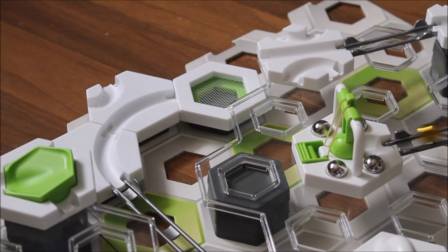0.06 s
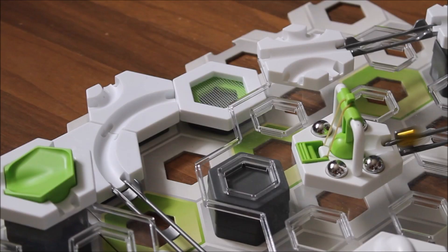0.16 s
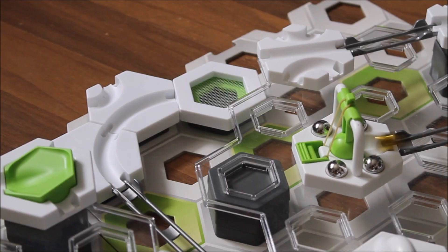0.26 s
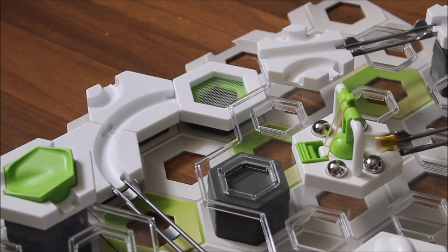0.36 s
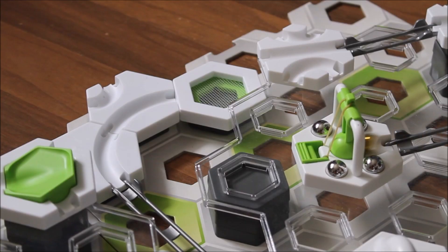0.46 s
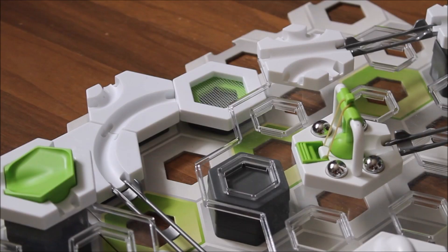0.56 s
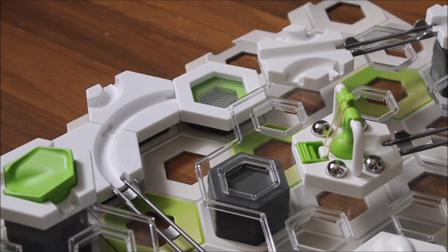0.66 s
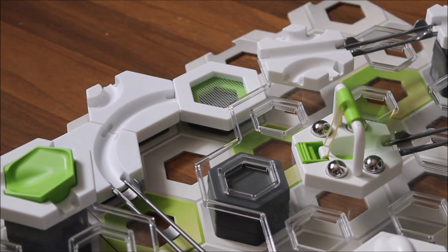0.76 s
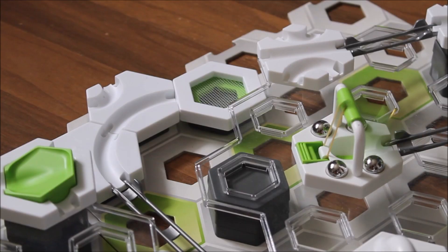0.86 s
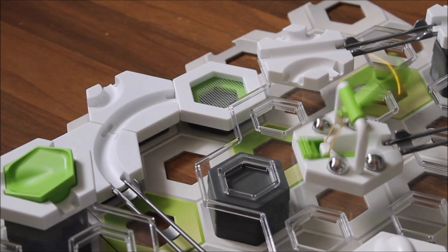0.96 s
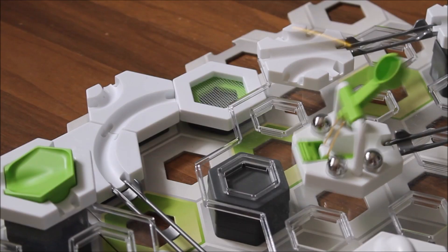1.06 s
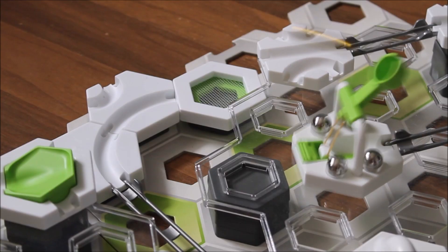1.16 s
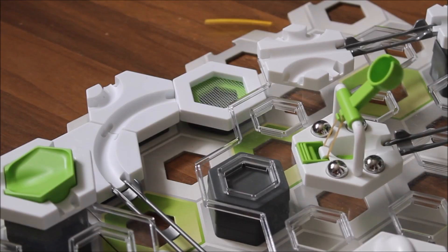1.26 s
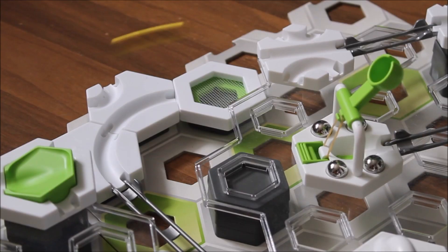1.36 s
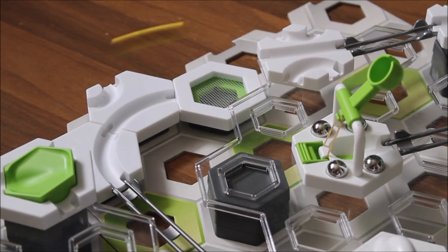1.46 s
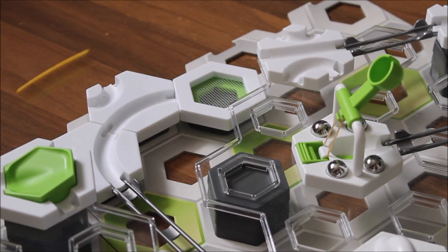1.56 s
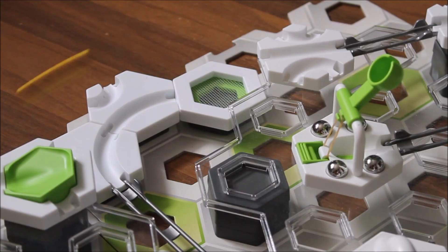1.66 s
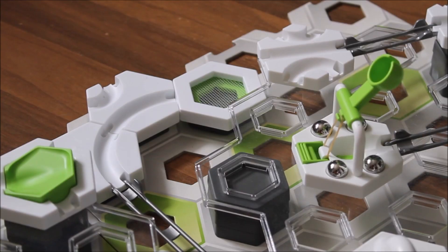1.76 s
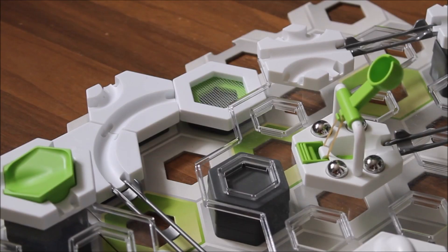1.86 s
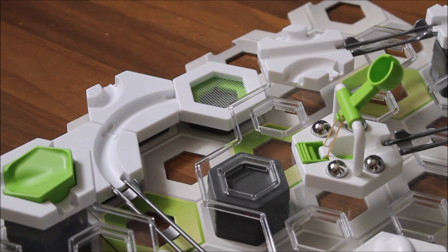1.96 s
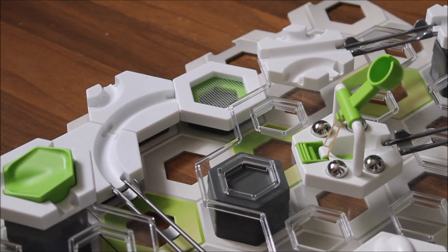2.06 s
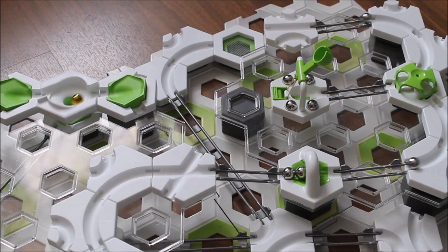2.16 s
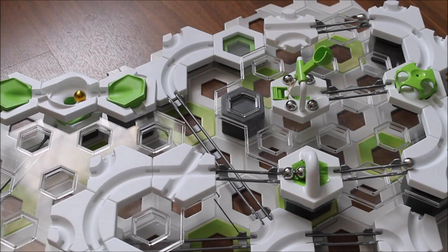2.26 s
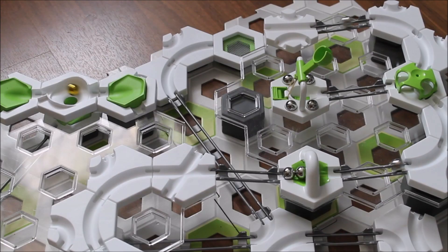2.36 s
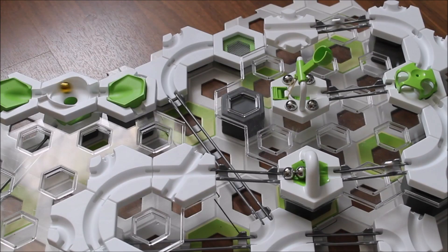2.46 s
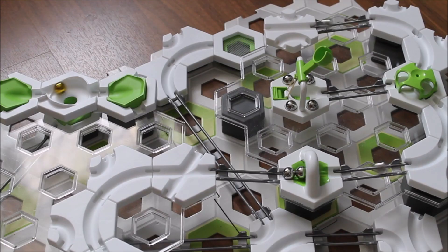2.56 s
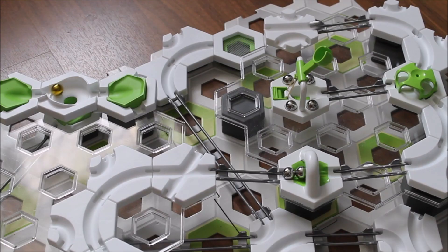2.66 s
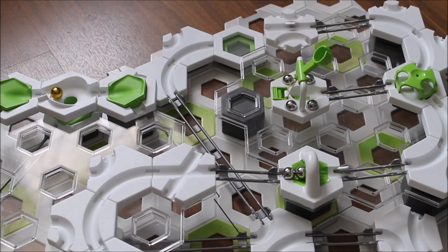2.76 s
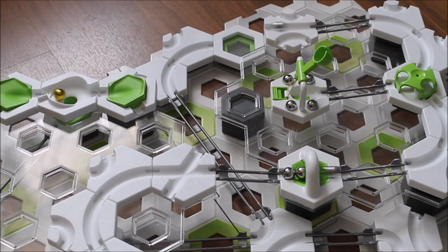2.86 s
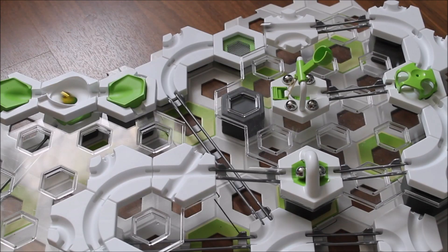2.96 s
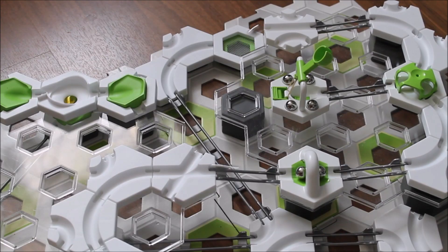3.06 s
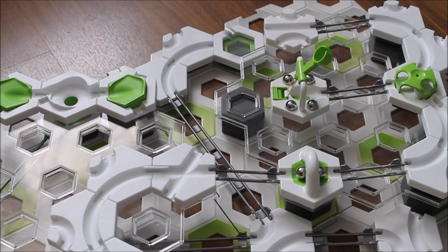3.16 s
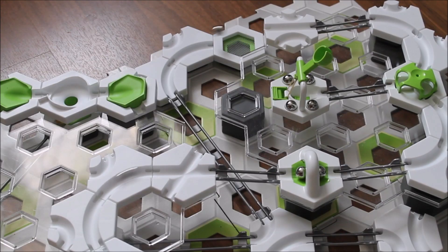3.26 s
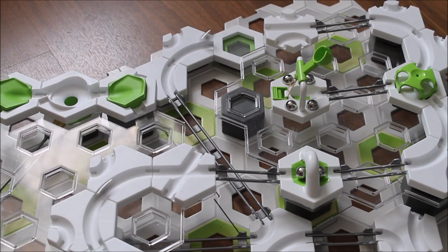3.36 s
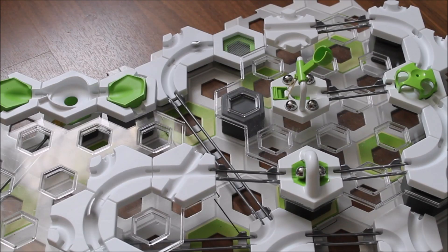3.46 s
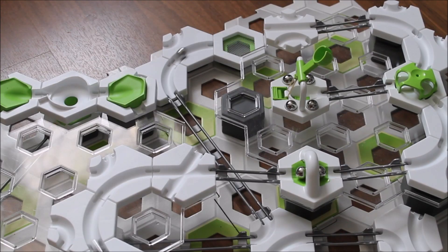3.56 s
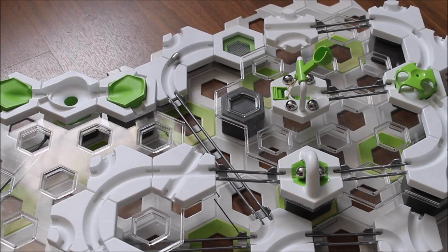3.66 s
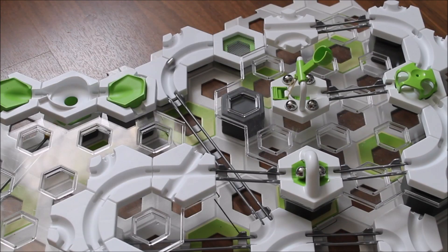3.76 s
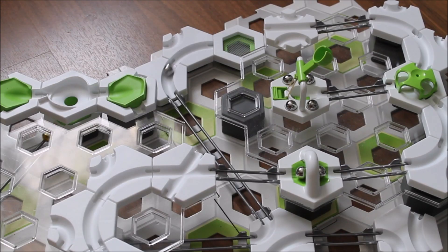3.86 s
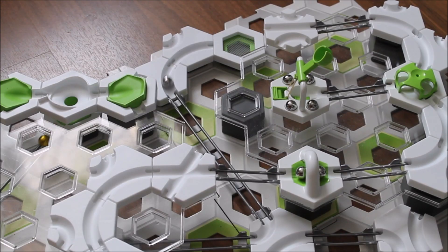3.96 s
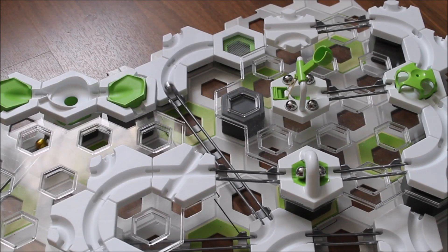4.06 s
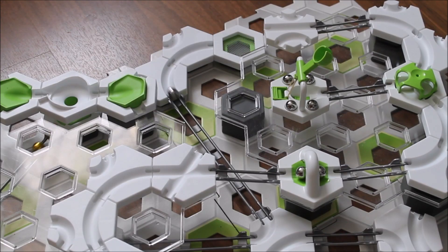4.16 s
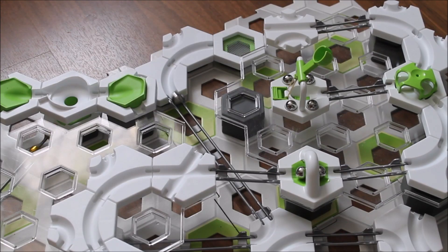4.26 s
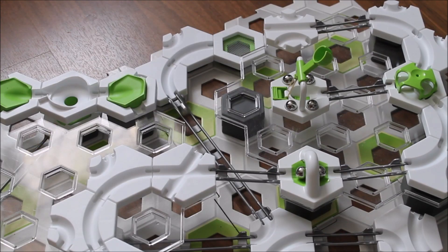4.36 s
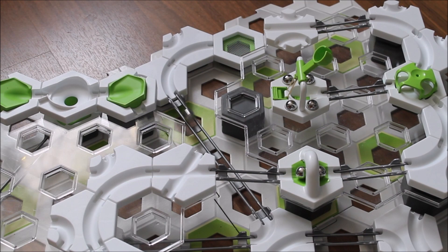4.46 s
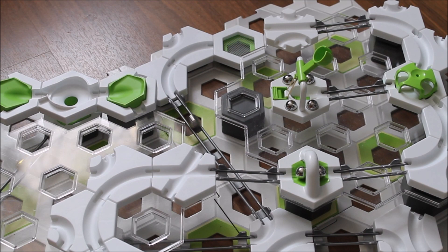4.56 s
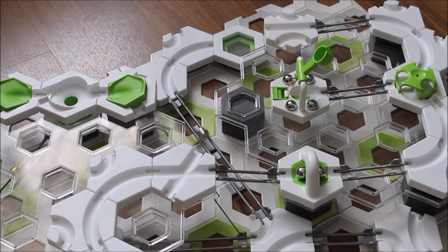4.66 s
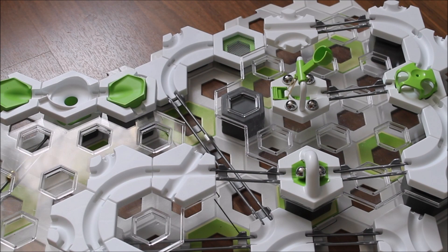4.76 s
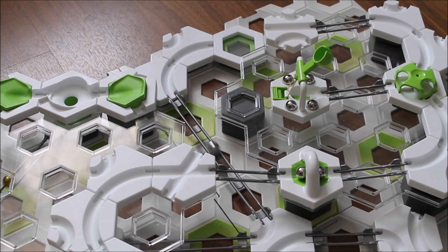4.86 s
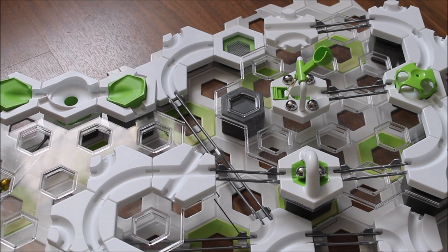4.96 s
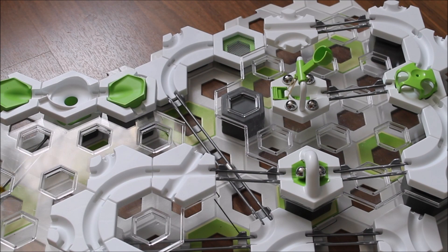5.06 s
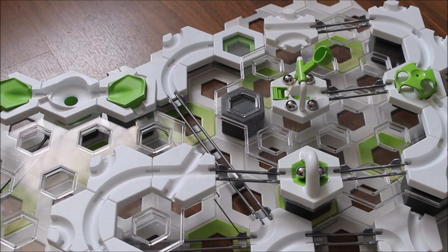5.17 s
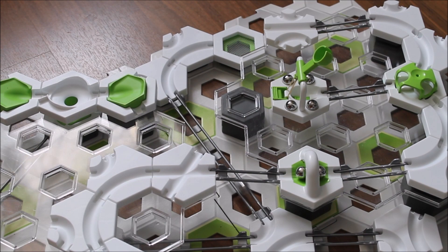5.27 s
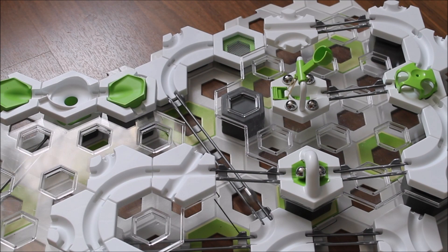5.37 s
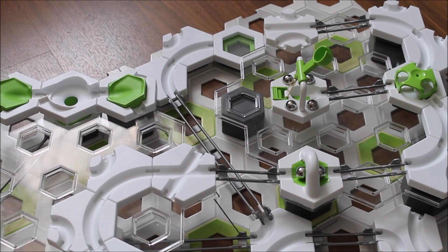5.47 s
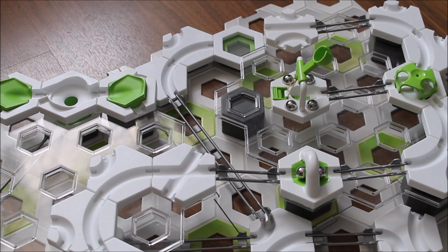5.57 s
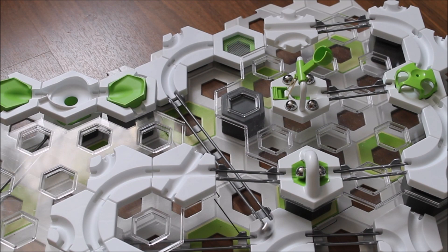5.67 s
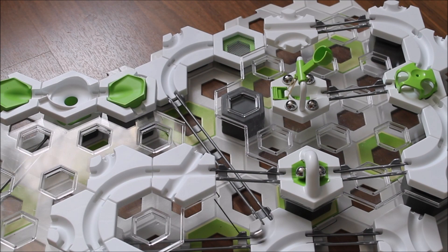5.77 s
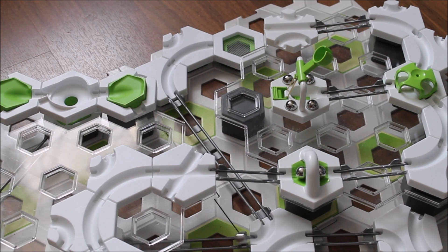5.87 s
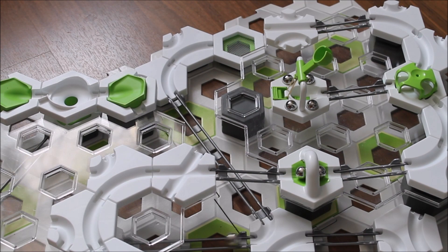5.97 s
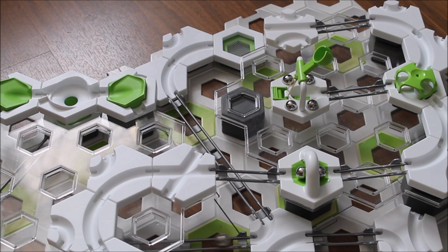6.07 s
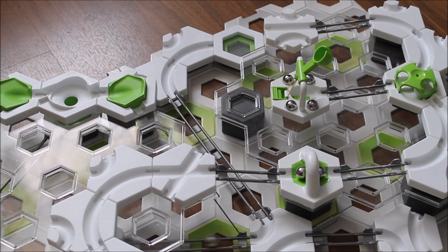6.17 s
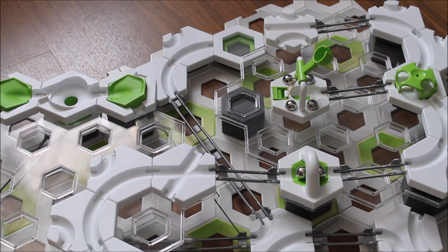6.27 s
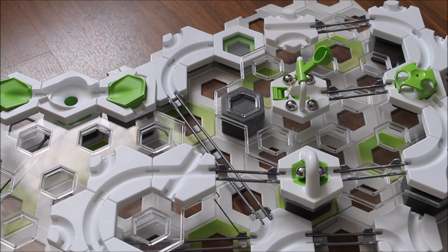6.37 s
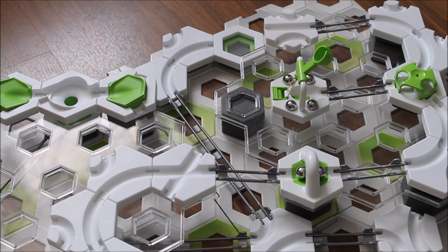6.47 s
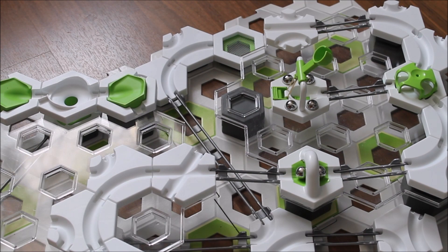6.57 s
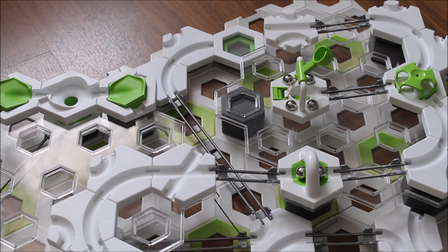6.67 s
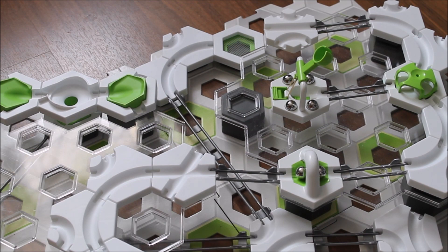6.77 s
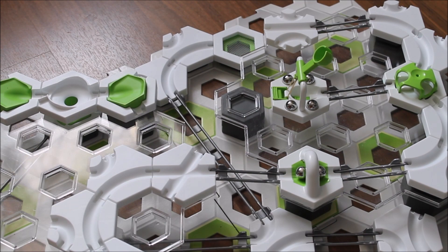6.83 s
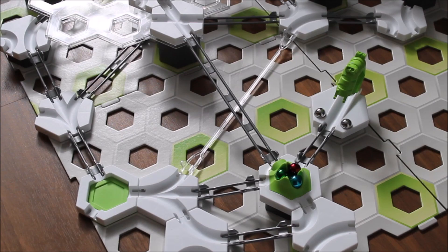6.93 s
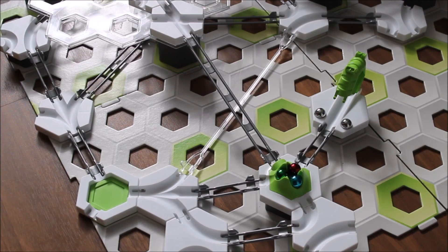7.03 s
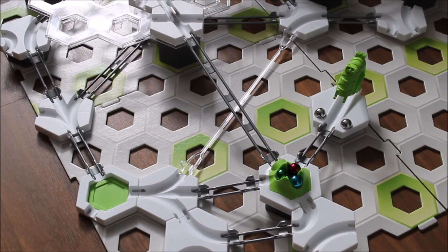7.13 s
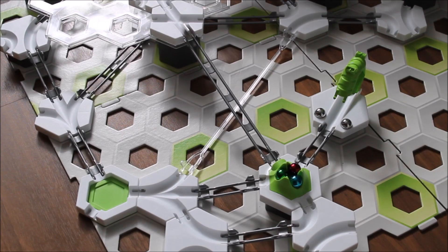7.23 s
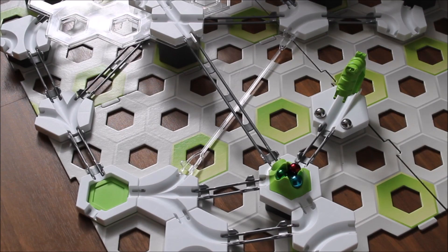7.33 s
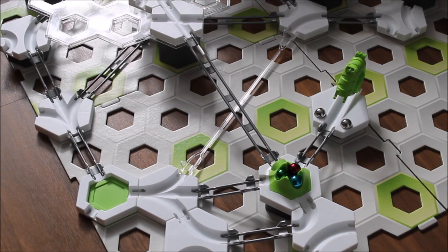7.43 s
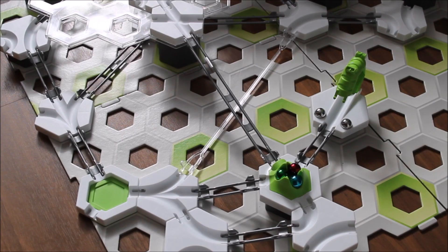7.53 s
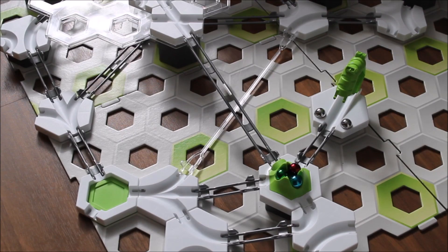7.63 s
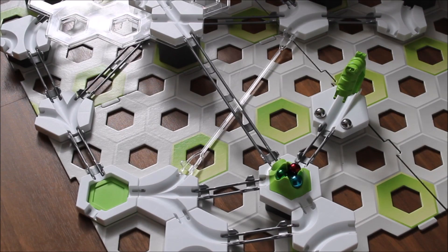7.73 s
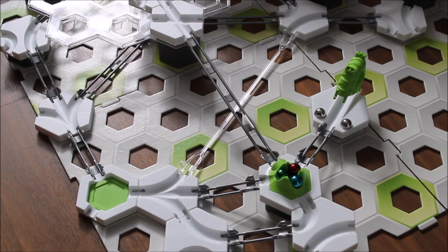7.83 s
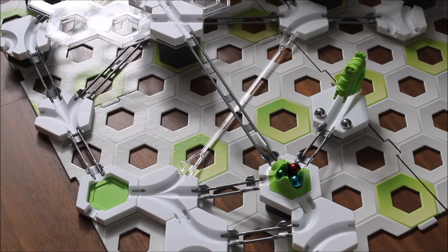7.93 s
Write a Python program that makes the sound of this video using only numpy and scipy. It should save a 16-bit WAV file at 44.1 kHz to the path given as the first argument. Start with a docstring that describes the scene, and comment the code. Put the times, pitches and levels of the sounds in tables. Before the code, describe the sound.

Small steel and glass marbles run through a hollow plastic track in a bare, echoing room, heard close. Hard knocks open, then a catapult launch plays slowed and an octave lower, with dull clunks and rail rattle. At normal speed come sharp landings, a rolling rumble and a bright clack. Sparse rail ticks follow in a quiet middle, then knocks and rolling return and fade away.

```python
"""Marble run in a ringing room

Marbles rumble over tiles, whirr along rails, knock into junctions, clack on steel and set off a catapult.
Knocks are taps with chatter, rolling is random bumps; both are coloured by the track and fill a bare room. Four
stretches follow one another, the second in slow motion: half as fast and an octave down. The hardest knocks
clip; a faint hiss lies below."""
import sys
import numpy as np
from scipy import signal
from scipy.fft import rfft, irfft
from scipy.io import wavfile

SR = 44100
rng = np.random.default_rng(int(sys.argv[2]) if len(sys.argv) > 2 else 0)


def to_wav(sig):
    """Store sig (one row per channel, or 1-D mono) as 16-bit WAV at the path in sys.argv[1].

    Samples outside -1..1 are clipped; the rate is SR.
    """
    pcm = np.clip(np.atleast_2d(sig), -1, 1) * 32767
    pcm = np.round(pcm).astype(np.int16)
    wavfile.write(sys.argv[1], SR, pcm.T)  # frames by channels


N = 352800
HZ = np.maximum(np.fft.rfftfreq(4096, 1 / SR), 10)   # grid for all track colours


def hit(part, strength_db, bright_db, direct_db, ring_q=3.7):
    """Knock: the struck part sets thud and ring, hardness sets the treble, the room answers."""
    # What a marble can strike. Each entry: bass thud in dB, ring in Hz, ring level in dB; all at full speed.
    struck_parts = {"tile": (-3, 2220, 6.1), "base plate": (6.5, 620, 9.9), "lever": (-4, 400, 15),
                    "bowl": (2.1, 974, 11.6), "junction": (0.9, 1380, 7.8), "switch": (1, 3200, 9),
                    "rail end": (0.81, 4040, 3.2), "rail": (5, 5900, 8), "catapult": (-8.5, 2800, 9.9),
                    "marble": (-12.5, 10200, 9.6), "landing": (4.5, 10300, 6), "stop": (16, 1500, 9.6)}
    # Plain hit. Each row: frequency in Hz, level in dB per Hz.
    hit_spectrum = [(50.0, -45.5), (100.0, -27), (200.0, -22.5), (350.0, -12), (600.0, -10.5),
                    (1000.0, -10), (1600.0, -9), (2500.0, -9.5), (3600.0, -13), (5000.0, -18),
                    (7000.0, -26.0), (9500.0, -34.5), (11500.0, -44)]
    thud_db, ring_hz, ring_db = struck_parts[part]
    thud = thud_db * at_hz([(50, 0.0), (230, 0.88), (1000, 0.014)])
    hardness = bright_db * at_hz([(1500, 0.036), (9000, 1)])
    ring = ring_db * resonance(ring_hz, ring_hz / ring_q)
    spot = loose_parts(spread_db=6.5, part_q=41.0)
    force = from_db(direct_db) * contact() + room_echoes()
    return through_track(force, strength_db + at_hz(hit_spectrum) + thud + hardness + ring + spot)


def contact(chatter_share=0.71, chatter_t60_s=0.025):
    """A one-sample tap, then the decaying noise chatter of loosely fitted parts; total energy 1."""
    t = np.arange(SR) / SR
    chatter = rng.standard_normal(SR) * np.exp(-np.log(1000) * np.minimum(t / chatter_t60_s, 10))
    chatter[0] = 0
    force = chatter * np.sqrt(chatter_share / np.sum(chatter ** 2))
    force[0] = np.sqrt(1 - chatter_share)
    return force


def loose_parts(spread_db, part_q, count=13):
    """Sharp random resonances of the struck spot, in dB; mean 0 dB on a log-frequency axis."""
    edges_hz = np.geomspace(600, 11000, count + 1)
    centres_hz = rng.uniform(edges_hz[:-1], edges_hz[1:])
    bumps_db = spread_db * np.max([resonance(hz, hz / part_q) for hz in centres_hz], axis=0)
    inside = (HZ > edges_hz[0]) * (HZ < edges_hz[-1])
    return bumps_db - inside * np.average(bumps_db, weights=inside / HZ)


def jolt(part, strength_db, bright_db, direct_db):
    """A marble strikes a joint's edge, hops and touches again: tap about as strong, less room behind it."""
    rebound_s, rebound_db, rebound_direct_db = .013, -6.5, 7
    first = hit(part, strength_db, bright_db, direct_db)
    second = hit(part, strength_db + rebound_db, bright_db, direct_db + rebound_direct_db)
    return first + np.pad(second, (round(rebound_s * SR), 0))[:len(first)]


def ringing_part(hz, level_db, t60_s, room_db=-2):
    """One lightly damped mode of a struck part, prolonged by the room."""
    t = np.arange(SR // 2) / SR
    tone = from_db(level_db) * np.sin(2 * np.pi * hz * t) * np.exp(-np.log(1000) * t / t60_s)
    tone = tone * (1 - np.exp(-hz * t))   # about one cycle to start swinging
    return tone + from_db(room_db) * signal.fftconvolve(tone, room_echoes())[:len(t)]


def clack(modes_db, splash_db, splash_hz=10000, splash_width_hz=7000):
    """Very short marble-on-steel contact: a treble splash in the room and a thin metallic shimmer."""
    # Bright, long modes. Each row: frequency in Hz, relative level in dB, t60 in seconds.
    steel_modes = [(7052, -4, .4), (7445, 0, .37), (7989, -4, .37), (9038, -2, .35), (9722, -2, .38),
                   (10440, -2, .34)]
    t = np.arange(SR) / SR
    shimmer = np.zeros(SR)
    for hz, db, t60_s in steel_modes:
        decay = np.exp(-np.log(1000) * t / t60_s)
        shimmer += from_db(modes_db + db) * np.sin(2 * np.pi * hz * t) * decay
    splash_colour_db = splash_db + 50 * (resonance(splash_hz, splash_width_hz) - 1)
    return shimmer + through_track(room_echoes(), splash_colour_db)[:SR]


def tile_rumble(clock_s):
    """Marbles rolling on tiles: dense small bumps, mostly low."""
    # Colour of rolling on tiles. Each row: frequency in Hz, level in dB per Hz.
    tile_spectrum = [(50.0, -42), (120.0, -20), (250.0, -5.5), (420.0, 1), (750.0, -1), (1200.0, -5.5),
                     (2000.0, -16.5), (3200.0, -32.5), (5500.0, -37.5), (11500.0, -51.5)]
    # Course of the rumble. Each row: scene time in seconds, level in dB.
    tile_level = [(0, -42), (.14, -57), (.43, -21.5), (1.05, -23), (1.6, -30), (1.95, -42.5), (2.25, -26),
                  (2.53, -45), (2.76, -24), (3.02, -17.5), (3.33, -5.5), (3.6, -17.5), (3.76, -15.5),
                  (4.3, -30), (4.8, -27), (5.05, -41), (5.6, -41.5), (5.8, -28.5), (6.7, -57),
                  (6.87, -20.5), (7.2, -18.5), (7.5, -29), (8, -30)]
    roll = rolling(at_hz(tile_spectrum), len(clock_s), bumps_per_s=600, uneven_db=3.0, direct_db=-1.0)
    return gain_at(tile_level, clock_s) * roll


def rail_whirr(clock_s):
    """Marbles rolling on steel rails: sparser bumps make the rails sing."""
    # Colour of rolling on rails. Each row: frequency in Hz, level in dB per Hz.
    rail_spectrum = [(50.0, -27), (120.0, -13), (250.0, -10.5), (420.0, -15.5), (750.0, 1), (1200.0, -3),
                     (2000.0, -5.5), (3200.0, -12), (5500.0, -20), (11500.0, -41)]
    # Singing of the rails. Each row: frequency in Hz, width in Hz, level in dB.
    rail_modes = [(835, 52, 2.5), (1860, 50, 5), (2840, 90, 4.5)]
    # Course of the whirr. Each row: scene time in seconds, level in dB.
    rail_level = [(0, -26), (.13, -19.5), (.43, -35.5), (.75, -36.5), (1.35, -14), (1.95, -33.5),
                  (2.6, -33.5), (3.9, -51), (4.45, -34), (4.95, -34), (5.25, -39.5), (6.05, -36.5),
                  (6.2, -48.5), (6.45, -33), (6.6, -21.5), (6.92, -18), (7.3, -46.5), (8, -29.5)]
    singing_db = sum(db * resonance(hz, width_hz) for hz, width_hz, db in rail_modes)
    colour_db = at_hz(rail_spectrum) + singing_db
    roll = rolling(colour_db, len(clock_s), bumps_per_s=250, uneven_db=3.5, direct_db=-9.0)
    return gain_at(rail_level, clock_s) * roll


def rolling(colour_db, size, bumps_per_s, uneven_db, direct_db):
    """Random bumps of uneven size under the marbles shake the track and fill the room."""
    length = size + SR   # one second of lead-in fills the room
    sizes = from_db(uneven_db * np.minimum(rng.exponential(1, length), 4))
    sizes = sizes * rng.choice([-1, 1], length)
    bumps = sizes * (rng.random(length) < bumps_per_s / SR)
    in_room = signal.fftconvolve(bumps, room_echoes())[:length]
    force = (from_db(direct_db) * bumps + in_room)[SR:]
    return through_track(force / np.std(force), colour_db)[:size]


def through_track(force, colour_db):
    """Colour a force and let the track's modes ring; minimum phase, so nothing sounds early."""
    # Resonances of the assembled track. Each row: frequency in Hz, width in Hz, level in dB.
    track_modes = [(403, 38, -0.5), (820, 150, 3.5), (1021, 16, 1.5), (1285, 15, -4), (1483, 31, 2.5),
                   (1775, 17, 3), (1920, 86, 4), (2208, 21, 2.5), (2428, 69, 2.5), (2490, 15, 0),
                   (2650, 37, 5), (3520, 60, 5.5), (3870, 70, 3), (4480, 60, 3.5), (5150, 420, -3),
                   (6000, 800, 0)]
    modes_db = sum(db * resonance(hz, width_hz) for hz, width_hz, db in track_modes)
    # folding the cepstrum gives minimum phase
    cepstrum = irfft(np.log(from_db(colour_db + modes_db)))
    cepstrum[1:len(HZ) - 1] *= 2
    cepstrum[len(HZ):] = 0
    return signal.fftconvolve(force, irfft(np.exp(rfft(cepstrum))))


def room_echoes():
    """One second of dense noise echoes, drawn anew for each source; the treble dies first."""
    # Decay of the room. Each row: band centre in Hz, t60 in seconds.
    room_decay = [(100, 0.87), (400, 0.79), (2500, 0.75), (4500, 0.62), (9000, 0.4)]
    room_db, build_s = -33.5, 0.0024
    t = np.arange(SR) / SR
    white = rfft(rng.standard_normal(SR))
    hz = np.maximum(np.fft.rfftfreq(SR, 1 / SR), 10)
    centres_hz, t60s_s = np.transpose(room_decay)
    tail = np.zeros(SR)
    for own, t60_s in zip(np.eye(len(centres_hz)), t60s_s):
        share = np.interp(np.log(hz), np.log(centres_hz), own)   # overlapping triangular bands
        tail += irfft(white * share) * np.exp(-np.log(1000) * t / t60_s)
    return from_db(room_db) * tail * (1 - np.exp(-t / build_s))


def hiss(size):
    """Faint, steady background of the room: shaped noise."""
    # Each row: frequency in Hz, level in dB per Hz.
    hiss_spectrum = [(40, -49), (300, -46), (2000, -63.5), (11000, -67.5)]
    hz = np.fft.rfftfreq(size, 1 / SR) + 1
    return irfft(rfft(rng.standard_normal(size)) * from_db(at_hz(hiss_spectrum, hz)), size)


def from_db(db):
    """Decibels to gain."""
    return 10 ** (np.asarray(db) / 20)


def at_hz(points, hz=HZ):
    """Read a table on a log-frequency axis."""
    freqs_hz, values = np.transpose(points)
    return np.interp(np.log(hz), np.log(freqs_hz), values)


def resonance(hz, width_hz):
    """Bell of height 1 around a resonance."""
    return 1 / (1 + (2 * hz / width_hz * np.log(HZ / hz)) ** 2)


def gain_at(curve, clock_s):
    """Read a level curve in dB at the given times, as a gain."""
    return from_db(np.interp(clock_s, *np.transpose(curve)))


def shot(start_s, end_s, slower):
    """One stretch at full speed, then drawn out in time, which lowers its pitch."""
    # Knocks. Each row: scene time in seconds, struck part, strength in dB, brightness in dB,
    # direct sound against the room in dB.
    knocks = [(.028, "stop", 26, 6.5, -7), (.064, "tile", 22.5, -1, 5), (.118, "base plate", 33, -6, -18),
              (.419, "tile", 5.5, -9, -2.5), (.458, "base plate", 23, -15.5, -2.5),
              (.766, "tile", 24, 1, -6), (.771, "lever", 24.5, -5.5, 4.5), (.802, "catapult", 23, 0.5, 3),
              (.815, "catapult", 19, -3, -1), (.841, "marble", 17.5, 0, 4), (.865, "lever", 31.5, -2, -10),
              (1.095, "tile", 27, 6, -5.5), (1.104, "marble", 25.5, -0.5, 2.5),
              (1.29, "rail end", 30.5, 6, -5), (1.313, "base plate", 28.5, -11, -4.5),
              (1.36, "rail end", 33.5, -10.5, -2), (1.381, "rail end", 18.5, 3.5, 10),
              (1.444, "rail end", 32, 0, -9), (1.548, "landing", 16, 2.5, -5),
              (1.999, "landing", 33.5, 6, 3.5), (2.033, "landing", 25.5, 1, 1),
              (2.062, "tile", 25.5, 7.5, 4.5), (2.108, "tile", 34.5, -0.5, -13),
              (2.132, "landing", 21.5, 1.5, 4.5), (2.233, "tile", 35.5, -8, -14),
              (2.265, "stop", 26.5, -6, -12), (2.3075, "tile", 24, 0.5, 3.5),
              (2.351, "tile", 27, -11, -0.5), (2.46, "stop", 15, -7, -4.5),
              (2.765, "base plate", 19, -35, 2.5), (2.845, "switch", 12.5, -6.5, -11),
              (2.979, "rail", 21.5, -24, -6), (3.056, "switch", 22, 12.5, -8),
              (3.0637, "marble", 23, 30, -10.5), (3.125, "junction", 24, 27, -24),
              (3.204, "switch", 31.5, -18.5, 2), (3.23, "catapult", 19, 12.5, -1),
              (3.27, "junction", 28, 1, -5.5), (3.35, "catapult", 14.5, 7, -7),
              (3.493, "rail end", 33, -4, 4), (3.525, "bowl", 36.5, -13.5, -27),
              (3.578, "tile", 26, 0, -10), (3.729, "rail", 22, -14, -0.5), (3.835, "rail", 11.5, -13, -4),
              (4.025, "rail", 13.5, -10, -3), (4.317, "rail", 17, -14.5, -4.5),
              (4.507, "rail", 17, -10.5, -11), (4.626, "rail end", 17.5, 1, -10),
              (4.6377, "rail", 7.5, 10.5, 5), (5.119, "rail", 16, -4.5, -5), (5.3425, "tile", 4, -22, -3),
              (5.696, "rail", 9, -14, -6), (5.78, "junction", 18, -11.5, -10),
              (6.01, "junction", 10.5, -7.5, -7), (6.196, "junction", 4, -13, -1),
              (6.33, "bowl", 12, -32.5, -4.5), (6.384, "bowl", 7, -37, 0), (6.44, "bowl", 24, -12, -5),
              (6.52, "junction", 22.5, -2.5, 0), (6.536, "rail", 29, -3, -4), (6.575, "rail", 7, -8, 5),
              (6.65, "junction", 20.5, -3, -16), (6.8, "rail", 15.5, 2.5, -17), (6.955, "rail", 12, -19, 5),
              (7.04, "rail end", 22.5, -25, -23), (7.188, "lever", 15.5, -21.5, -1.5),
              (7.436, "landing", 5, -0.5, -4.5), (7.483, "rail", 13.5, -6.5, -8),
              (7.675, "rail end", 1, 3, 1), (7.805, "rail end", 6, -1, -13)]
    # Knocks with a quick rebound. Columns as for the knocks.
    rebounding_knocks = [(0, "tile", 35.5, -2.5, -11.5), (2.656, "tile", 26, -12.5, -2),
                         (4.1, "rail", 12.5, 4, -6.5), (4.69, "rail end", 27, 7.5, -8),
                         (5.56, "tile", 14.5, -14, -7), (6.8508, "landing", 25, -6.5, -0.5),
                         (7.518, "rail", 15, -7.5, -5.5)]
    # Parts with a clear pitch. Each row: scene time in seconds, then at full speed
    # frequency in Hz, level in dB, t60 in seconds.
    pitched_parts = [(.003, 3360, -20, 0.13), (.064, 2200, -6, 0.059), (.771, 434, -20, 0.033),
                     (.8025, 9080, -19.5, 0.021), (1.999, 484, -4, 0.035), (2.0, 2040, -30, 0.082),
                     (2.3075, 2230, -12, 0.046), (2.46, 325, -23.5, 0.092), (2.765, 700, -17, 0.055),
                     (3.27, 1430, -8, 0.013), (3.525, 1023, -13.5, 0.24), (6.8506, 764, -1.5, 0.02)]
    # Hardest marble-on-steel clack. Each row: scene time in seconds, shimmer in dB, treble splash in dB.
    hard_clacks = [(3.0637, -22, 21)]
    top_hz, early_s = 11750, .003
    size = int((end_s - start_s) * SR / slower) + 2
    clock_s = start_s + np.arange(size) * slower / SR
    out = tile_rumble(clock_s) + rail_whirr(clock_s) + hiss(size)
    sources = (knocks, hit), (rebounding_knocks, jolt), (pitched_parts, ringing_part), (hard_clacks, clack)
    for events, source in sources:
        for at_s, *blow in events:
            if start_s <= at_s + early_s < end_s:
                at = max(0, round((at_s - start_s) * SR / slower))
                sound = source(*blow)[:size - at]
                out[at:at + len(sound)] += sound
    # the microphone's top edge also drops an octave in slow motion
    out = signal.sosfilt(signal.ellip(10, .3, 90, top_hz, fs=SR, output="sos"), out)
    return signal.resample_poly(out, slower, 1)


def scene():
    """The stretches follow one another, each ending in a 1 ms fade."""
    # Each row: start in seconds, end in seconds, times slower.
    stretches = [(0, .132, 1), (.132, 2.2, 2), (2.233, 7.007, 1), (7.039, 8.0, 1)]
    out = np.zeros((1, N))
    for start_s, end_s, slower in stretches:
        first, last = round(start_s * SR), round(end_s * SR)
        fade = np.minimum(np.arange(last - first)[::-1] / (.001 * SR), 1)
        out[0, first:last] = fade * shot(start_s, end_s, slower)[:last - first]
    return out


def record(dry):
    """Thin the deepest bass, clip peaks at full scale, cut the top."""
    bass_hz, cutoff_hz = 35, 16000
    thinned = signal.sosfilt(signal.butter(1, bass_hz, "high", fs=SR, output="sos"), dry)
    clipped = np.clip(thinned, -1, 1)
    return signal.sosfilt(signal.ellip(8, .1, 80, cutoff_hz, fs=SR, output="sos"), clipped)


dry = scene()
out = record(dry)
to_wav(out)
```